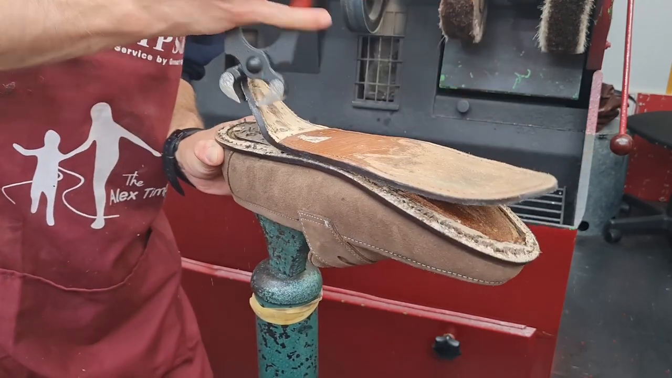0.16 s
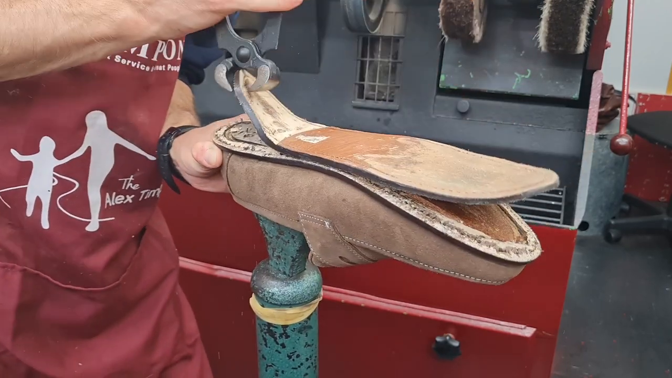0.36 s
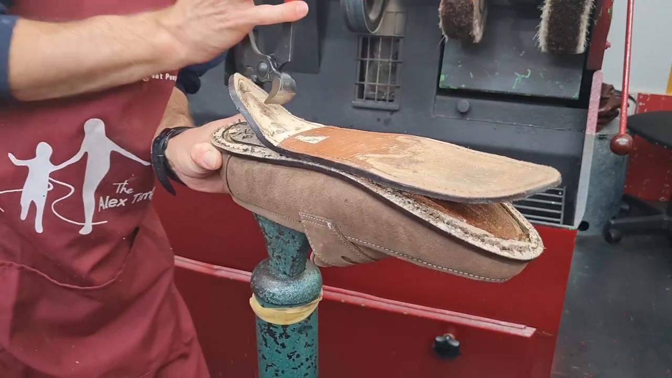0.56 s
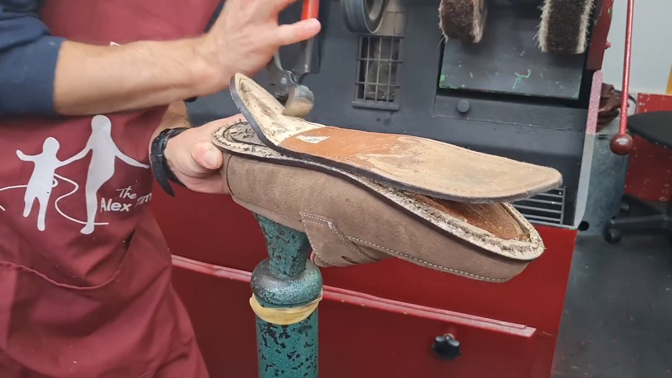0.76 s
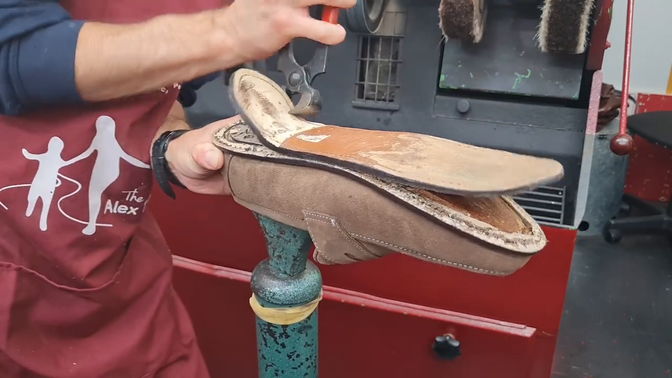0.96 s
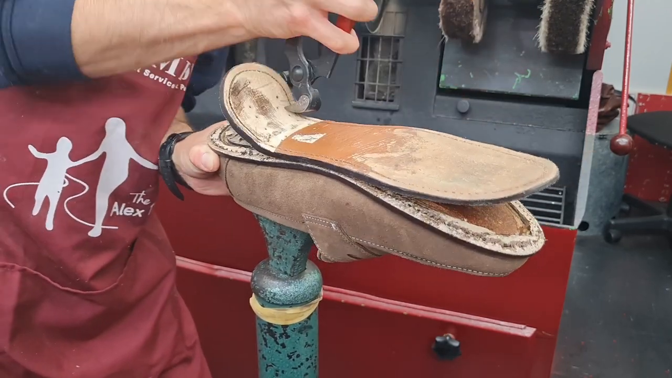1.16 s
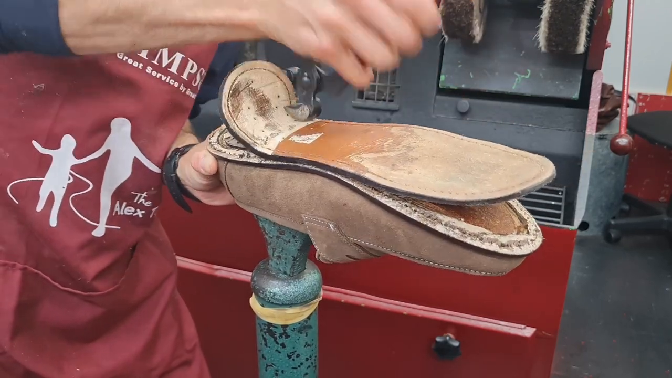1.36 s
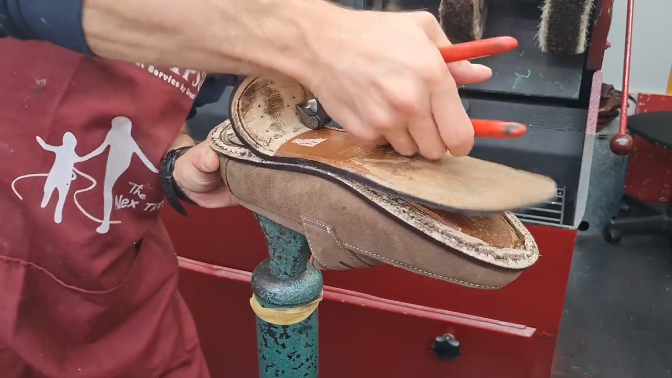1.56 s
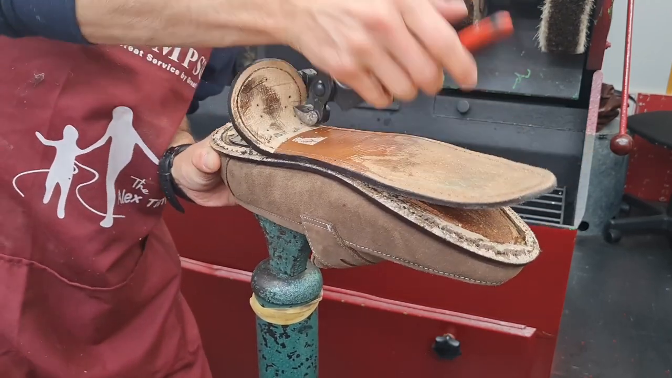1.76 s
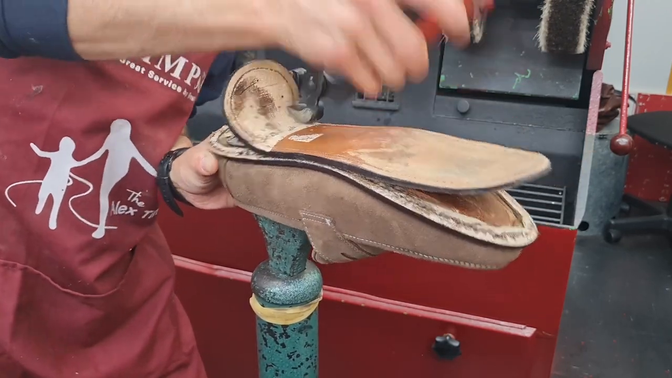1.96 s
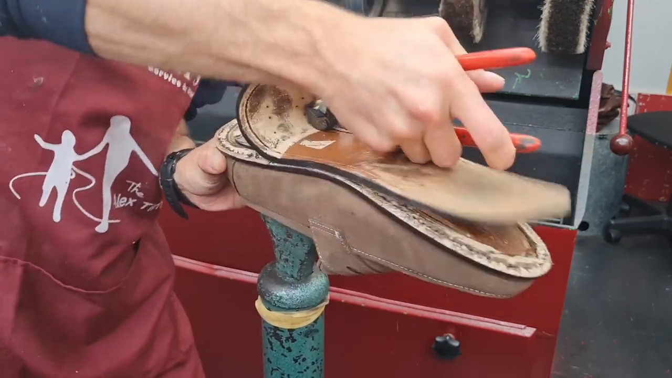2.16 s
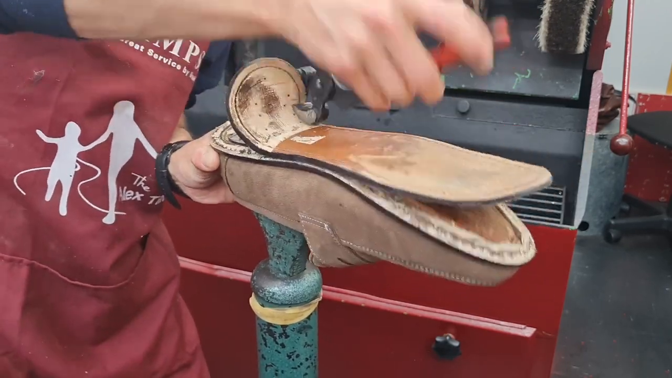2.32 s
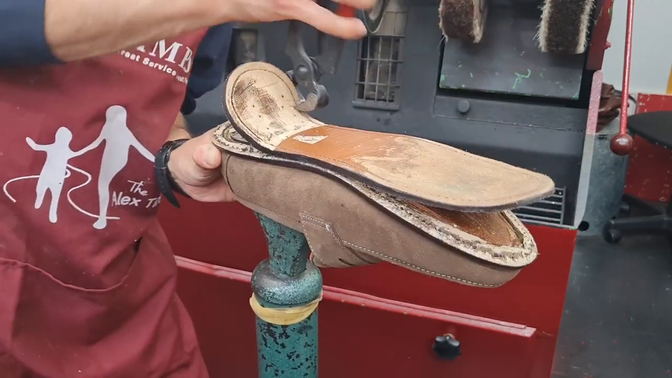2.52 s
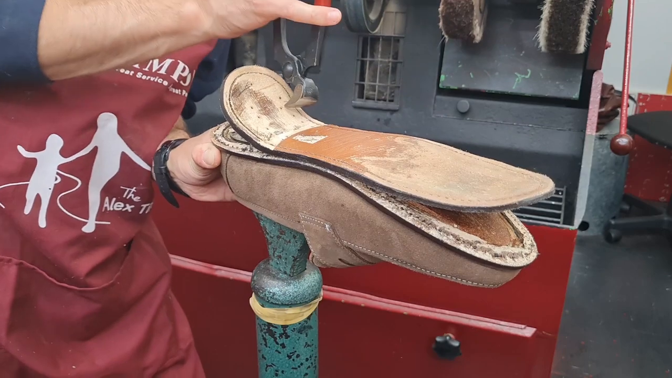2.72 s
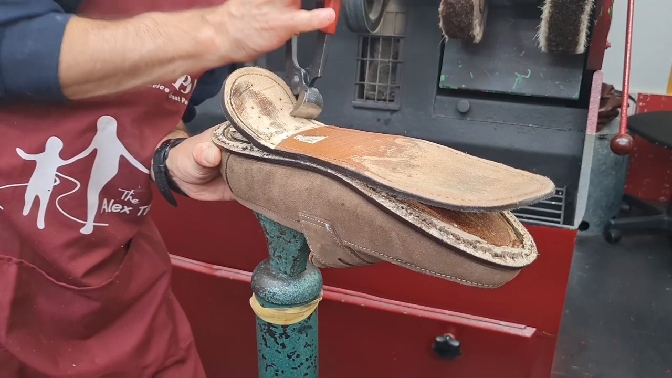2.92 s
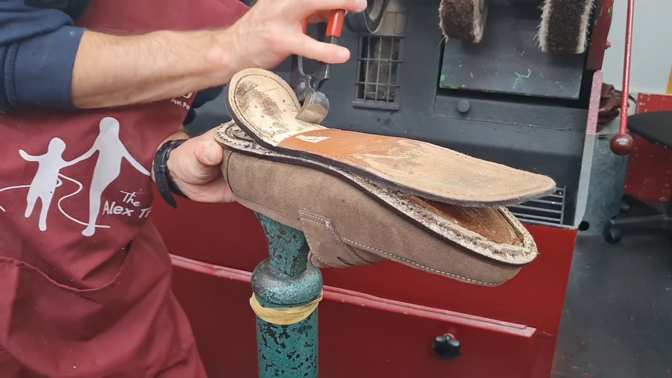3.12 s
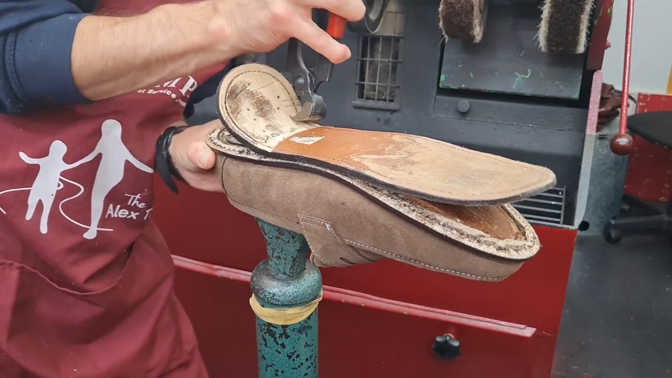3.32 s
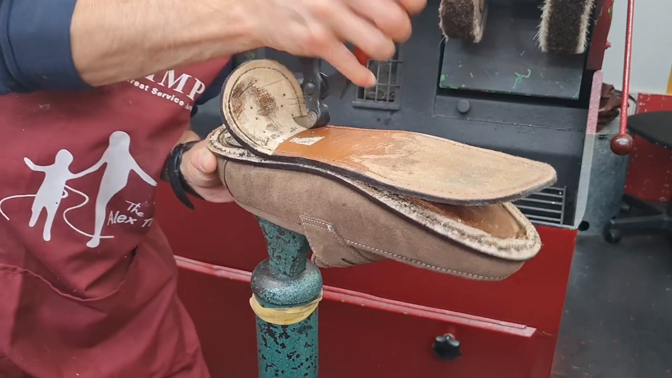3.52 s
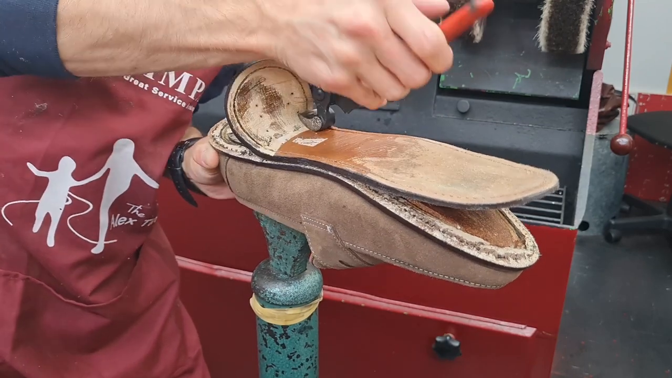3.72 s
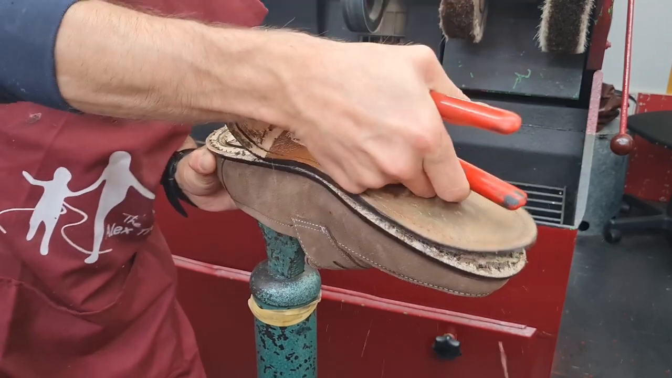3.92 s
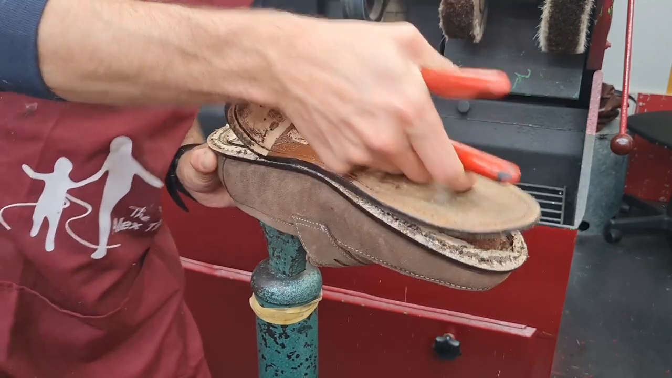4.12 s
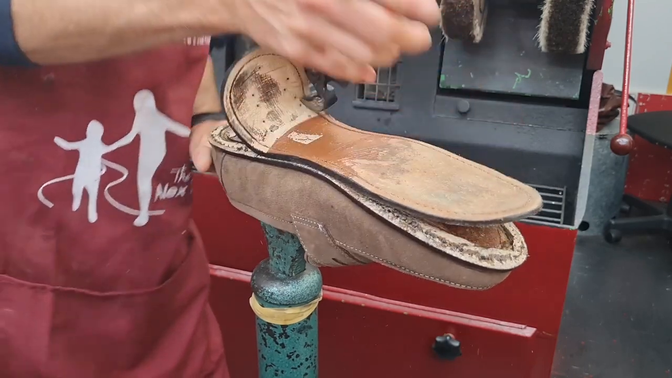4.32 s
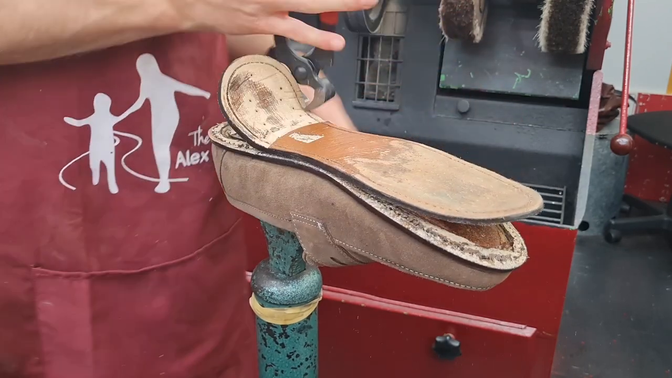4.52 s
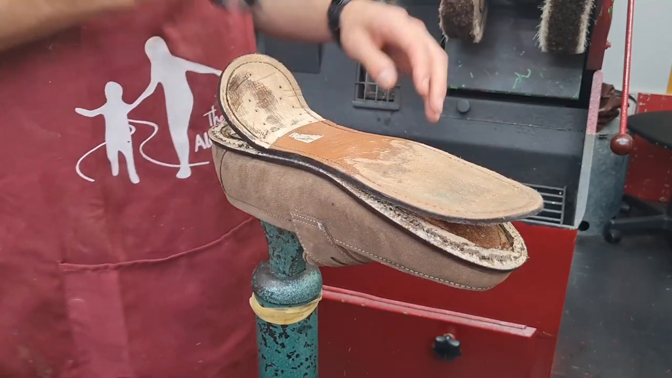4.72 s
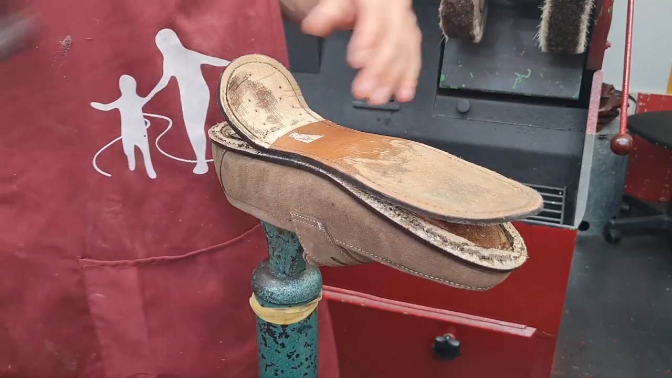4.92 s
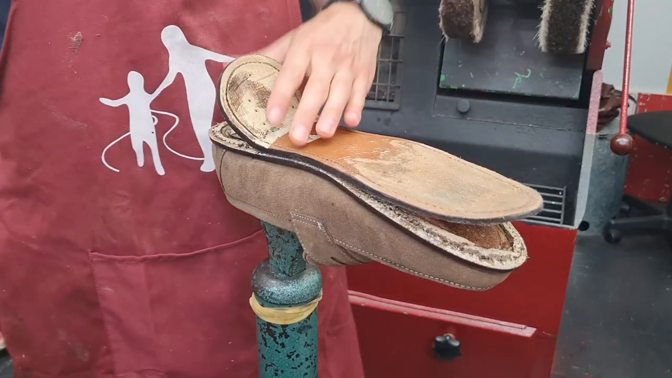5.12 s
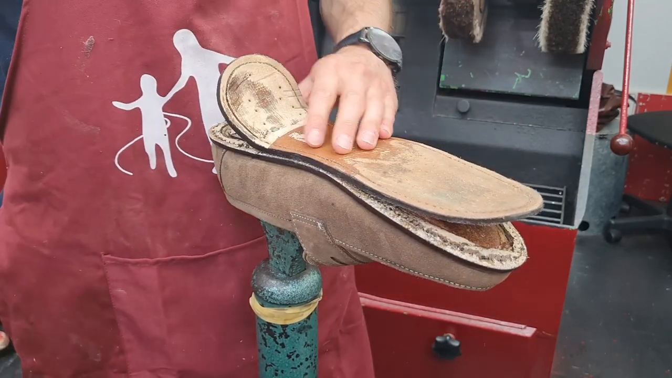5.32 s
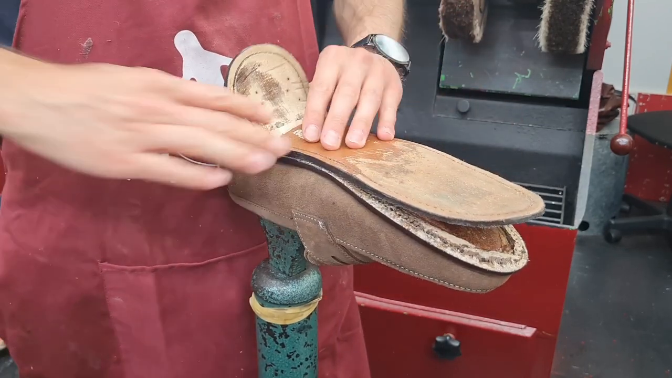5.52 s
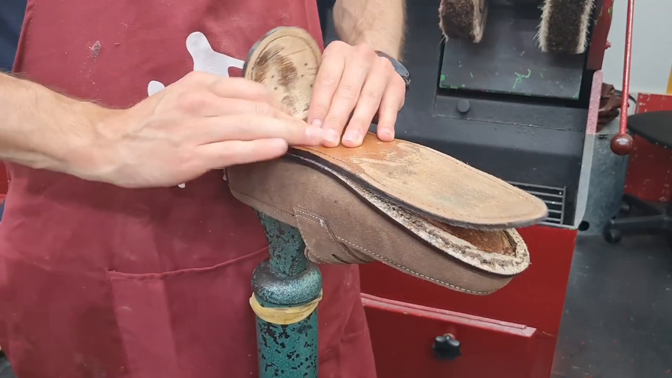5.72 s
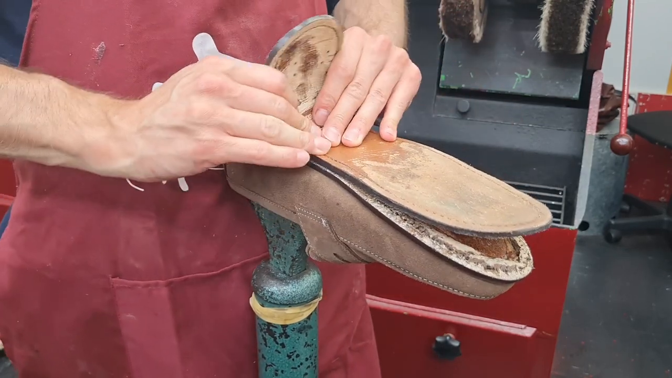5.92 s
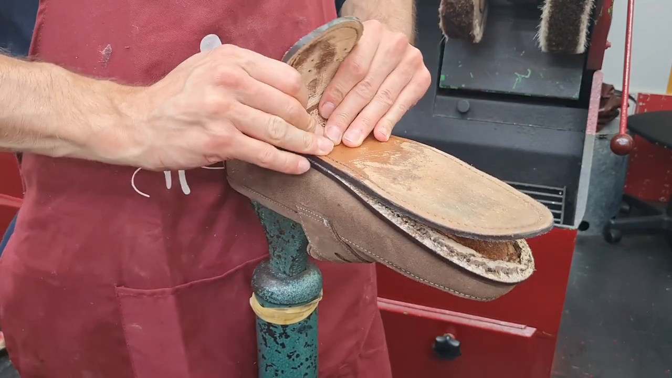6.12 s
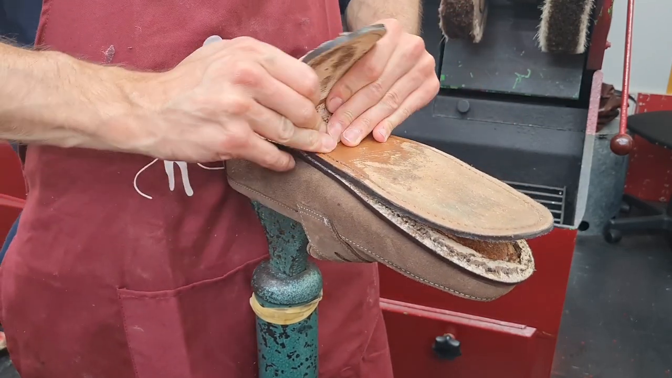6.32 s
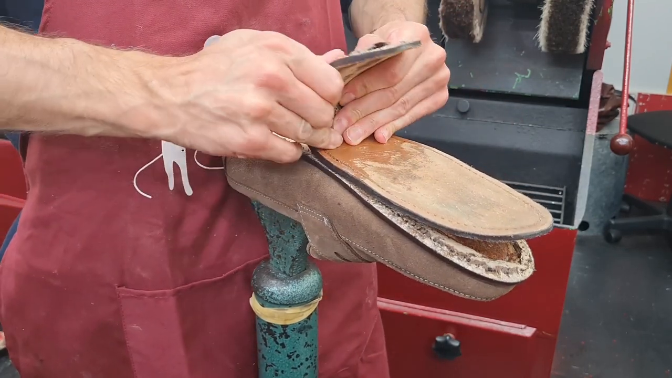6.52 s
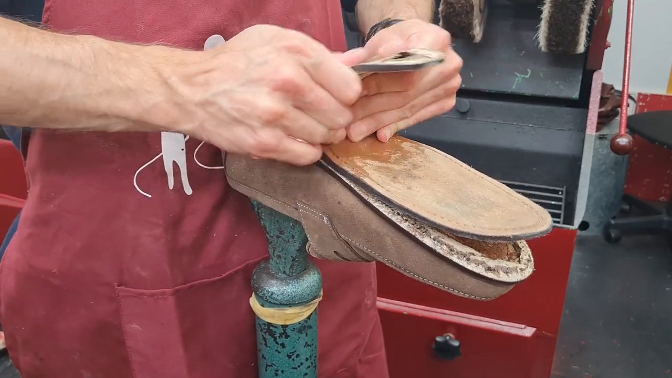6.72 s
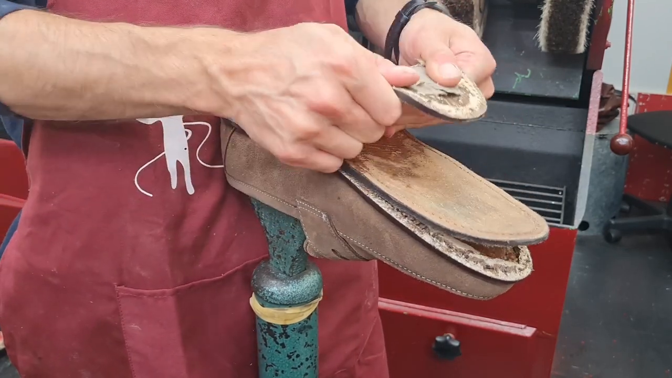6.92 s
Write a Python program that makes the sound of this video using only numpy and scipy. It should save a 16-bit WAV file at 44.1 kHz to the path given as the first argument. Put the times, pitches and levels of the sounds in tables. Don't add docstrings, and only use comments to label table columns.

```python
import sys
import numpy as np
from scipy import signal
from scipy.fft import rfft, irfft, next_fast_len
from scipy.io import wavfile
from scipy.ndimage import uniform_filter1d, map_coordinates

SR = 44100
rng = np.random.default_rng(int(sys.argv[2]) if len(sys.argv) > 2 else 0)


def put_to_file(sound):
    columns = np.atleast_2d(sound).T
    safe = np.clip(columns, -1, 1)
    whole_steps = np.round(safe * 32767)
    wavfile.write(sys.argv[1], SR, whole_steps.astype(np.int16))


def attenuation_scalar(level_db):
    decades = np.asarray(level_db, float) / 20
    return 10 ** decades


N = 311778
T = np.arange(SR * 2 // 5) / SR

# (f/Hz, t60/s)
ROOM_DECAY = [(100, 0.38), (500, 0.22), (2000, 0.14), (6000, 0.18), (14000, 0.17)]
# (f/Hz, likeness/0-1)
ALIKE = [(60, 0.78), (200, .93), (400, .7), (800, 0), (2000, 0.021)]
# (f/Hz, density/dB)
RUMBLE_TONE = [(25, -8), (40, -19), (62, 10.5), (80, 4.5), (125, 4.5), (175, 2), (230, -39)]
AIR_TONE = [(110, -53), (180, -6), (236, -7), (269, -2.5), (309, -4), (451, -20), (793, -23), (872, -37.5),
            (1090, -23), (1920, -31.5), (3000, -43.5), (3900, -72), (6600, -120)]
# (t/s, load level/dB, sway level/dB)
LEAN = [(0, -47.5, -56), (.67, -62.5, -78), (1.4, -62.5, -65), (2.0, -63, -59), (2.4, -49, -52),
        (2.8, -63.5, -51), (3.25, -57, -53), (3.8, -52, -51.5), (4.3, -50, -54.5), (4.75, -57, -66.5),
        (5.5, -53, -43.5), (5.9, -58, -74), (6.3, -59.5, -67), (6.85, -48, -62), (7.07, -50, -52)]
# (t/s, f/Hz, level/dB)
HOLLOW = [(0, 273, -49.5), (.6, 271.2, -64), (1.9, 249.1, -65.5), (2.7, 269.8, -61.5), (3.6, 250, -63),
          (4.1, 253.5, -45), (4.31, 235, -43.5), (4.8, 237.9, -54), (5.2, 246.1, -48.5), (5.5, 249.4, -47),
          (6.0, 248.5, -53), (6.26, 231, -53), (6.71, 257, -41), (6.85, 269.9, -41.5), (7.07, 276.4, -54)]
# (t/s, length/s, peak level/dB, start f/Hz, end f/Hz)
SQUEAKS = [
    (1.068, .027, -42, 940, 1260),
    (2.950, .03, -58, 1350, 1150),
]
# (peak t/s, rise/s, fall/s, level/dB)
BRUSHES = [
    (4.918, .006, .075, -46),
    (5.102, .012, .1, -60),
    (3.252, .006, .06, -60),
    (6.30, .1, .08, -56),
]
# (peak t/s, rise/s, fall/s, level/dB, creak over scuff/dB)
STROKES = [(0.278, 0.12, 0.038, -53, 6.5), (0.495, 0.07, 0.1, -57, 2), (.8, 0.11, 0.24, -62, 3),
           (1.04, 0.074, 0.12, -54, -2.5), (1.218, 0.019, 0.075, -68.5, 19), (1.523, 0.045, 0.12, -54, -2),
           (1.761, .03, .1, -77.5, -18.5), (2.02, 0.02, 0.07, -70.5, 14.5), (2.2, 0.32, 0.92, -67.5, 14),
           (2.92, 0.1, 0.09, -68, -24.5), (3.07, 0.059, .12, -56.5, -1), (3.253, 0.017, 0.1, -59, 5),
           (3.335, .04, .07, -61, 0), (3.45, .07, .08, -65, 0), (2.36, .04, .1, -55, 6),
           (3.9, 0.071, 0.9, -62.5, 7), (4.21, 0.033, 0.11, -57, 4), (4.38, 0.047, .12, -61, 9),
           (4.63, 0.22, 0.19, -60, 3.5), (4.82, 0.13, 0.33, -62.5, 4), (4.96, 0.055, 0.15, -68, 2),
           (5.109, 0.057, 0.23, -62, 1.5), (5.58, 0.22, 0.042, -62, -15), (5.809, .015, 0.082, -64, 11)]
# (peak t/s, rise/s, fall/s, level/dB)
PEELS = [(0.501, 0.054, 0.64, -77), (.82, .12, 0.4, -66.5), (1.0, 0.064, 0.33, -65.5),
         (1.535, 0.035, 0.11, -39), (1.64, .02, .04, -52), (2.96, 0.093, 0.06, -69),
         (3.07, .07, 0.091, -60.5), (3.799, .2, 0.3, -59), (4.25, .1, 0.079, -62), (4.6, .4, .25, -72),
         (4.925, 0.012, 0.09, -60), (5.105, 0.012, .09, -72), (5.56, 0.089, .05, -63),
         (5.71, .08, 0.16, -62)]
# (peak t/s, rise/s, fall/s, effort level/dB)
TUGS = [(6.04, 0.15, 0.46, -51), (6.47, .1, 0.08, -41), (6.68, 0.31, .25, -50), (6.88, 0.16, 0.14, -42),
        (6.846, .008, .02, -42), (6.872, .02, .025, -40), (6.893, .015, .04, -38), (6.40, .05, .05, -50),
        (6.665, .04, .04, -51), (6.775, .02, .05, -50), (6.18, .01, .05, -50), (7.0, 0.18, 0.36, -55)]
# (f/Hz, density/dB)
BRUSH_TONE = [(1500, -30), (3000, -4), (4200, 0), (6500, -3), (9000, -12), (13000, -20), (16000, -34)]
CREAK_TONE = [(250, -24.5), (420, 0), (650, 0), (1200, -4), (1800, -31.5)]
SCUFF_TONE = [(500, -43), (1000, -7.5), (1600, 4), (2600, -4), (4500, -11), (8000, -18), (12000, -64)]
FIZZ_TONE = [(1760, -23.5), (3000, -4.5), (3290, -2.5), (4470, -8), (4830, -4), (5510, -4.5), (6900, -3),
             (7500, -6.5), (14500, -2.5), (16000, 2.5)]
# (t/s, peak level/dB, f/Hz)
PUSHES = [(0.266, -23, 270), (2.362, -16, 105), (2.405, -24, 115), (2.345, -30, 270), (2.691, -30.5, 107.7),
          (4.198, -31.5, 143), (2.488, -21, 280), (2.86, -40.5, 105), (5.312, -9.5, 387), (5.415, -12, 370)]
# (t/s, peak level/dB,
# f/Hz, stopped after/s)
THUMPS = [(2.151, -9, 138, .046), (2.245, -26, 135, .025), (2.292, -26, 120, .03), (2.345, -24, 170, .05),
          (2.465, -20, 160, .06), (0.001, -26, 170, .02), (1.022, -36, 200, .03), (5.322, -15, 400, .03),
          (5.325, -13, 260, .03), (3.965, -14, 255, .04), (5.308, -5, 255, .016), (5.408, -7, 235, .016)]
# (t/s, peak level/dB, gripped after/s)
SINGS = [
    (.03, -45, .12),
    (.14, -53, .2),
    (1.51, -53, .16),
    (2.147, -34, .22),
    (2.456, -43, .21),
    (3.96, -40, .15),
]
# (t/s, peak level/dB, f/Hz, t60/s)
CLANKS = [(0.030, -25, 2500, 0.11), (.030, -28, 4150, .08), (.460, -54, 1200, .05), (.490, -52, 1350, .07),
          (.525, -55, 1200, .04), (2.227, -36, 1300, .05), (2.358, -42, 1150, .04), (2.422, -41, 1400, .04),
          (3.248, -48, 700, .06), (3.299, -50, 700, .07), (2.955, -54, 2500, .05),
          (0.029, -19, 1060, 0.037), (.137, -19, 986, 0.07), (0.14, -33.5, 1557, 0.14),
          (1.01, -38, 3750, 0.062), (1.008, -41, 1590, 0.1), (1.012, -36.5, 2560, 0.024),
          (1.012, -44, 2330, .08), (1.212, -62, 980, .1), (2.823, -58, 1600, .04), (2.862, -55, 1620, .05),
          (2.863, -58, 2150, .04), (2.888, -56, 1600, .06), (2.890, -58, 2100, .06),
          (3.335, -57, 1950, .06), (3.330, -58, 1450, .05), (1.210, -59, 2540, 0.075),
          (1.211, -60, 1690, 0.07), (6.843, -29, 2070, 0.015), (1.512, -35, 634, 0.19),
          (2.092, -45, 2575, 0.087), (2.145, -10.5, 1320, 0.049), (2.456, -21, 957, 0.061),
          (2.46, -29.5, 597, 0.18),
          (3.881, -13, 1180, 0.02), (3.93, 0, 623, 0.015), (3.962, -10.5, 998, 0.036),
               (3.96, -18.5, 637, 0.13), (3.960, -22, 4150, .09), (3.960, -27, 4720, .08),
               (3.990, -26, 3330, .05), (3.960, -34, 7300, .05), (3.929, -11, 2200, 0.014),
               (3.96, -25, 2340, 0.047), (2.147, -29, 2600, 0.075), (2.150, -27, 640, .15),
               (2.147, -24, 460, .06), (5.312, -11, 490, 0.18), (5.4, -13, 1810, 0.11),
               (5.425, -16, 530, .12), (5.420, -24, 850, .1), (5.460, -18, 1000, .05),
               (5.330, -25, 880, .08)]
# (t/s, peak level/dB, upper level/dB, top level/dB)
SNAPS = [(0.791, -43.5, -32, -34), (0.983, -37.5, -0.5, -11), (1.635, -49.5, 4, 21), (2.421, -42, -20, -30),
         (2.823, -49, -11, -24), (2.861, -45, -12, -30.5), (3.075, -37.5, -23, -29), (3.247, -33, -16, -14),
         (3.298, -35, -16, -20), (4.093, -33, -4, -20), (4.139, -27, -2, -8), (4.196, -33, -4, -10),
         (4.383, -44, -10, -20), (4.430, -48, -10, -20), (4.913, -26, 8, 5), (5.801, -41, -48, -28),
         (6.087, -52, -6, 1), (6.097, -17, -1, 6), (6.171, -22, 0, 7), (6.265, -44, 0, 4),
         (6.306, -30, -2.5, 0.5), (6.498, -30.5, 3, 8), (6.842, -20, -2, 0), (4.925, -30, 6, -2),
         (2.888, -47, -12, -28), (3.475, -48, -20, -30), (1.505, -46, 0, 8), (6.646, -42, 0, 3),
         (6.770, -42, 0, 4), (6.890, -30, 0, 4)]
# (t/s, peak level/dB, upper level/dB, top level/dB)
LEADS = [
    (2.135, -30, -14, -36),
    (2.346, -45, -25, -36),
    (2.384, -44, -22, -38),
    (3.921, -19, -14, -12),
]
# (f/Hz, density/dB)
SNAP_TONE = [(250, -32.5), (500, -5), (1500, 1.5), (4000, 12.5), (8000, -9.5), (16000, -8)]
# (t/s, crack level/dB, stand thud/dB, shoe box/dB, crack t60/s)
DROPS = [
    (5.3078, -1, -14.5, -4, 0.04),
    (5.3316, -15, -15.5, -7, 0.12),
    (5.3632, -13, -9, -2, 0.083),
    (5.3991, 2.5, -20, -7, 0.04),
    (5.4114, -0.5, -31, -9, 0.087),
    (5.4274, -15, -23, -3, 0.02),
    (5.4589, 0, -22, -8, 0.034),
]
# (t/s, crack level/dB, stand thud/dB, shoe box/dB, crack t60/s)
CUTS = [
    (3.8802, -9.5, -12, -15, 0.018),
    (3.9297, -0.5, -27, -15, 0.0147),
]
# (t/s, crack level/dB, stand thud/dB, shoe box/dB, crack t60/s)
BLOWS = [
    (0.0074, -27, 0, -8, 0.07),
    (0.0255, -15, -16.5, -13, 0.089),
    (0.136, -16, -13, -21.5, 0.046),
    (1.0086, -35, -4, -2.5, 0.048),
    (1.51, -23.5, -13.5, -1, 0.032),
    (2.093, -39, 3, 4.5, 0.065),
    (2.146, -1, -16, -12.5, 0.021),
    (2.4559, -15.5, -4.5, -9, 0.06),
    (3.9570, -6, -7.5, -6.5, 0.035),
]
# (f/Hz, density/dB)
DROP_TONE = [(240, -26), (400, -4), (879, -1.5), (1460, -10), (1810, -11), (5770, -28), (6630, -37.5),
             (8350, -36.5), (14300, -48.5), (16000, -40)]
CUT_TONE = [(240, -32), (400, 9), (2320, -6), (3980, -11), (6500, -9), (10100, -24), (14800, -19),
            (16000, -58)]
BLOW_TONE = [(240, -34.5), (400, -6), (1290, -7), (1870, -6), (2220, -10), (3690, -5.5), (5020, -19.5),
             (8350, -21), (14800, -35), (16000, -37)]
# (f/Hz, level/dB, t60/s)
STAND_MODES = [(62, -9, .25), (112, -6, .3), (140, 0, .3), (165, -9, .2)]
SHOE_MODES = [(222.6, -6.5, 0.058), (253.9, 4.5, 0.12), (288, -5.5, 0.12), (367, -11.5, 0.049)]
STEEL_MODES = [(3800, -4.5, 0.094), (4420, -15, 0.15), (5450, -20.5, 0.23), (5920, -25.5, 0.19),
               (7400, -35, 0.22), (7900, -29.5, 0.13)]
# (f/Hz, gain/dB, left over right/dB)
PORTS = [(20, -10, -1), (45, 0, -1), (300, 0, 0), (1500, 0, 0), (5000, 0, 0), (9000, 0, 7), (15000, 0, 5)]
# (f/Hz, rarity/sigmas)
GAPS = [(2300, 6), (4300, .35), (5500, 1.2), (7800, 1.35), (11000, 2.8)]


def unit(x):
    return x / np.sqrt(np.mean(x ** 2) + 1e-20)


def along(points, hz):
    f, v = np.transpose(points)
    return np.interp(np.log(hz + 1), np.log(f + 1), v)


def curves(rows):
    s, *cols = np.transpose(rows)
    return [np.interp(np.arange(N) / SR, s, c) for c in cols]


def wobble(rate):
    knots = rng.standard_normal(int(N * rate / SR) + 4)
    return map_coordinates(knots, [np.arange(N) * rate / SR])


def swell(s, rise, fall, db):
    t = np.arange(N) / SR - s
    return attenuation_scalar(db - 20 * (t / np.where(t < 0, abs(rise), abs(fall))) ** 2)


def filtered(x, response):
    m = next_fast_len(x.shape[-1] + 4096)
    spectrum = rfft(x, m) * response(np.fft.rfftfreq(m, 1 / SR))
    return irfft(spectrum, m)[..., :x.shape[-1]]


def diffuse(pair):
    def mid_side(hz):
        turn = np.arccos(np.clip(along(ALIKE, hz), -1, 1)) / 2
        return np.array([np.cos(turn), np.sin(turn)])

    mid, side = filtered(pair, mid_side)
    return np.array([mid + side, mid - side])


def rush(spectrum, grain_db=0):
    grains = attenuation_scalar(grain_db * wobble(830))
    noise = diffuse(grains * rng.standard_normal((2, N)))
    return unit(filtered(noise, lambda hz: attenuation_scalar(along(spectrum, hz))))


def ring(modes, attack):
    tones = np.zeros(len(T))
    for scatter_db, (hz, db, t60) in zip(rng.normal(0, 1.5, len(modes)), modes):
        tones += attenuation_scalar(db + scatter_db - 60 * T / t60) * np.sin(2 * np.pi * hz * T)
    return tones * (1 - np.exp(-T / attack))


def crack(spectrum, t60, colour):
    fall = attenuation_scalar(-60 * T / np.clip(t60, .004, .3)) * (1 - np.exp(-(T / 0.00031) ** 2))
    burst = fall * rng.standard_normal(len(T))
    burst[40] += 2.2
    burst = filtered(burst, lambda hz: attenuation_scalar(along(spectrum, hz) + along(colour, hz)))
    return burst / np.abs(burst).max()


def add(track, s, sound, wet_db, lead):
    hz, t, z = signal.stft(rng.standard_normal((2, len(T))), SR, nperseg=256)
    decay = attenuation_scalar(-60 * t / along(ROOM_DECAY, hz)[:, None])
    tail = diffuse(signal.istft(z * decay, SR, nperseg=256)[1])
    wet = signal.fftconvolve(sound[None], tail / np.linalg.norm(tail[0]), axes=1)[:, :len(T)]
    wet = filtered(wet, lambda f: attenuation_scalar(along([(120, -4.5), (500, 2)], f)))
    start = round(s * SR)
    track[0, start - round(lead / 2):][:len(T)] += sound
    track[1, start + round(lead / 2):][:len(T)] += sound
    track[:, start + 130:start + 130 + len(T)] += attenuation_scalar(wet_db) * wet


def shake():
    t60_s, rise_s = 0.34, 0.018
    t = np.arange(N) / SR
    tremble = np.zeros(N)
    for s, db, thud_db, *_ in [*BLOWS, *CUTS, *DROPS]:
        since = np.maximum(t - s, 0)
        tremble += attenuation_scalar(db + thud_db - 60 * since / t60_s) * (1 - np.exp(-since / rise_s))
    return tremble


def shop():
    load_db, sway_db = curves(LEAN)
    jolt = shake()
    hum_phase = 2 * np.pi * np.cumsum(44 + 2.0 * wobble(3.2)) / SR
    hum = attenuation_scalar(sway_db + 4.0 + 1.6 * wobble(16)) * np.sin(hum_phase)
    whine_phase = 2 * np.pi * np.cumsum(1125 + 9 * wobble(20)) / SR
    whine = attenuation_scalar(-79 + 3 * wobble(8)) * np.sin(whine_phase)
    rumble = (attenuation_scalar(load_db + 3.5) + attenuation_scalar(-9) * jolt) * rush(RUMBLE_TONE)
    rest_db, follows_load = -67.5, 0.86
    air_gain = attenuation_scalar(rest_db + follows_load * (load_db - load_db.mean())) + attenuation_scalar(-20) * jolt
    murmur = air_gain * attenuation_scalar(13.5 + 0.89 * wobble(11)) * rush(AIR_TONE)
    return hum + rumble + murmur + whine


def hollow():
    hz, db = curves(HOLLOW)
    phase = 2 * np.pi * np.cumsum(hz + 4.0 * wobble(40)) / SR
    gain = (attenuation_scalar(db) + attenuation_scalar(-19) * shake()) * attenuation_scalar(1.23 + 0.9 * wobble(22))
    return gain * np.sin(phase + np.array([[.15], [-.15]]))


def squeaks():
    track = np.zeros((2, N + SR))
    for s, length, db, from_hz, to_hz in SQUEAKS:
        u = np.clip(T / length, 0, 1)
        phase = 2 * np.pi * np.cumsum(from_hz + (to_hz - from_hz) * u) / SR
        tone = np.sin(phase) + attenuation_scalar(-11) * np.sin(2 * phase)
        add(track, s, attenuation_scalar(db) * np.sin(np.pi * u) * tone, wet_db=-8.0, lead=4)
    return track[:, :N]


def rubbing():
    effort = sum(swell(*row) for row in TUGS)
    effort_db = 20 * np.log10(effort + 1e-9)
    rest_db, creak_under_db, creak_grows = -44.5, 13.5, 1.2
    creak = attenuation_scalar(rest_db - creak_under_db + creak_grows * (effort_db - rest_db))
    scuff = attenuation_scalar(effort_db - 12)
    for s, rise, fall, db, dull_db in STROKES:
        creak = creak + swell(s, rise, fall, db + dull_db / 2)
        scuff = scuff + swell(s, rise, fall, db - dull_db / 2)
    fizz = sum(swell(*row) for row in PEELS) + attenuation_scalar(effort_db)
    brush = sum(swell(*row) for row in BRUSHES)
    leather = creak * attenuation_scalar(1.5) * rush(CREAK_TONE, grain_db=2.5) + scuff * rush(SCUFF_TONE, grain_db=1.5)
    glue = fizz * rush(FIZZ_TONE, grain_db=3.5)
    rustle = brush * rush(BRUSH_TONE, grain_db=2.5)
    stick = attenuation_scalar(1.2 * wobble(110) + 1.2 * wobble(25))
    return stick * (leather + glue + rustle)


def stand_pushes():
    track = np.zeros((2, N + SR))
    for s, db, hz, held in THUMPS:
        stopped = np.exp(-(T / held) ** 4)
        add(track, s, ring([(hz, db, .4)], attack=.003) * stopped, wet_db=-12.0, lead=6)
    for s, db, hz in PUSHES:
        push = ring([(hz, db, .12), (hz * 1.475, db - 8.0, .08)], attack=0.01)
        add(track, s - .004, push, wet_db=0.0, lead=6)
    return track[:, :N]


def snapping():
    track = np.zeros((2, N + SR))
    clicks = [(*row, .011) for row in SNAPS] + [(*row, .0073) for row in LEADS]
    for s, db, upper_db, top_db, t60 in clicks:
        edge = crack(SNAP_TONE, t60, [(2200, 0), (4500, upper_db - 3.5), (10000, top_db + 6.5)])
        add(track, s, attenuation_scalar(db + max(0, upper_db, top_db)) * edge, wet_db=-11, lead=6)
    return track[:, :N]


def ringing_steel():
    track = np.zeros((2, N + SR))
    for s, db, hz, t60 in CLANKS:
        add(track, s, ring([(hz, db + 3, t60)], attack=.001), wet_db=-9, lead=2)
    handle_hz = 3338
    for s, db, grip in SINGS:
        pair = ring([(handle_hz, db, .75), (handle_hz + 42, db - 9.0, .7)], attack=.002)
        add(track, s, pair * np.exp(-(T / grip) ** 4), wet_db=-14, lead=2)
    return track[:, :N]


def knocks(rows, spectrum, steel_db, wet_db, lead, bright_db, hardens):
    track = np.zeros((2, N + SR))
    for s, db, thud_db, box_db, t60 in rows:
        stand = attenuation_scalar(thud_db - 2.5) * ring(STAND_MODES, attack=0.00081)
        shoe = attenuation_scalar(box_db - 5.5) * ring(SHOE_MODES, attack=0.0019)
        metal = attenuation_scalar(steel_db) * ring(STEEL_MODES, attack=0.00083)
        edge = crack(spectrum, t60, [(5000, 0), (9000, bright_db + hardens * db)])
        add(track, s, attenuation_scalar(db) * (stand + shoe + metal + edge), wet_db, lead)
    return track[:, :N]


def tool_drop():
    return knocks(DROPS, DROP_TONE, steel_db=-39, wet_db=-5.0, lead=19, bright_db=6.5, hardens=0.16)


def stitch_bites():
    return knocks(CUTS, CUT_TONE, steel_db=-48, wet_db=-3.5, lead=4, bright_db=-4.5, hardens=-1.16)


def pincer_blows():
    return knocks(BLOWS, BLOW_TONE, steel_db=-27.5, wet_db=3.5, lead=6, bright_db=-0.5, hardens=0.76)


def scene():
    bench_side, stand_side = attenuation_scalar([[1.1], [-1.1]]), attenuation_scalar([[-0.35], [0.35]])
    background = shop() + hollow() + squeaks()
    contacts = stand_pushes() + snapping() + ringing_steel()
    at_stand = stand_side * (background + contacts + pincer_blows())
    return at_stand + rubbing() + bench_side * tool_drop() + stitch_bites()


def thinned(x):
    hz, _, z = signal.stft(x, SR, nperseg=1024)
    bands = np.arange(len(hz)) // 9
    field = uniform_filter1d(rng.standard_normal(z.shape[1:]), size=5, axis=1)[bands]
    power = uniform_filter1d(np.abs(z).mean(0) ** 2, size=31, axis=0)
    power = uniform_filter1d(power, size=5, axis=1)
    hiss = power[(hz > 9000) & (hz < 15000)].mean(0)
    over_db = 10 * np.log10(np.abs(hiss / (np.abs(power) + 1e-20)) + 1e-9)
    masking = .24
    rarity = along(GAPS, hz)[:, None] - masking * np.clip(over_db, -6, 6)
    kept = unit(field) < rarity
    return signal.istft(z * kept, SR, nperseg=1024)[1][:, :N]


def band_limit(x):
    return signal.sosfilt(signal.butter(12, 16120, fs=SR, output="sos"), x)


def record(dry):
    hz, gain_db, tilt_db = np.transpose(PORTS)

    def port(f):
        tilt = along(np.c_[hz, tilt_db], f) * np.array([[.5], [-.5]])
        return attenuation_scalar(along(np.c_[hz, gain_db], f) + tilt)

    heard = filtered(dry, port)
    clipped = heard / (1 + np.abs(heard / 1.1) ** 8) ** (1 / 8)
    limited = filtered(clipped, lambda f: attenuation_scalar(along([(15400, 0), (16000, -16), (16130, -70)], f)))
    return band_limit(thinned(limited))


dry = scene()
out = record(dry)
put_to_file(out)
```